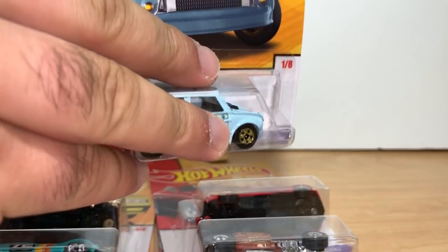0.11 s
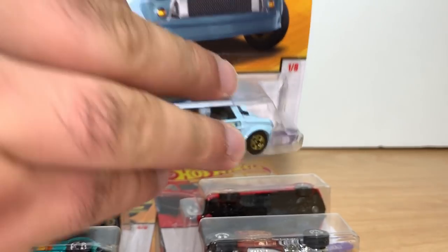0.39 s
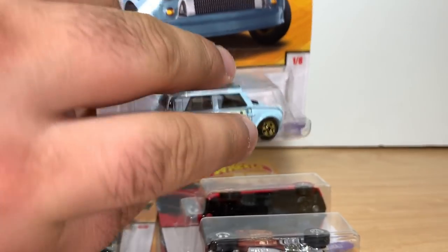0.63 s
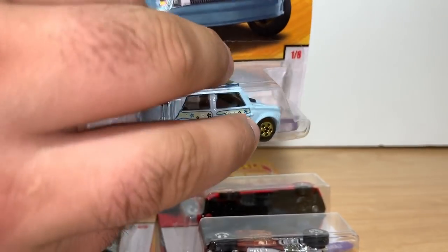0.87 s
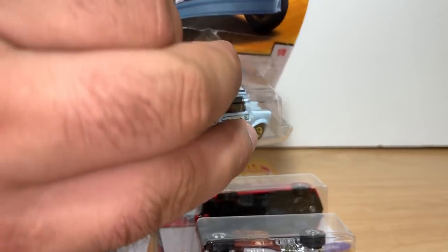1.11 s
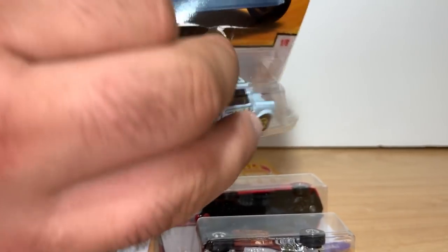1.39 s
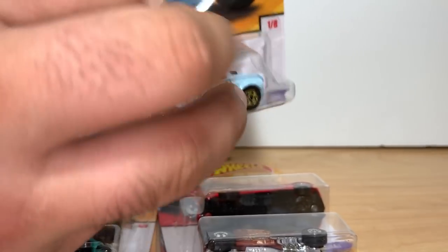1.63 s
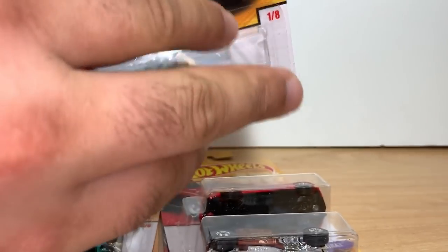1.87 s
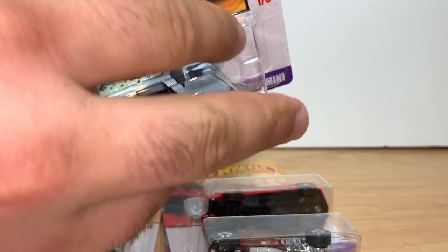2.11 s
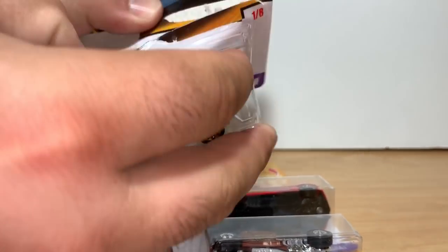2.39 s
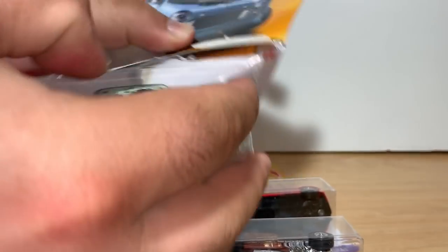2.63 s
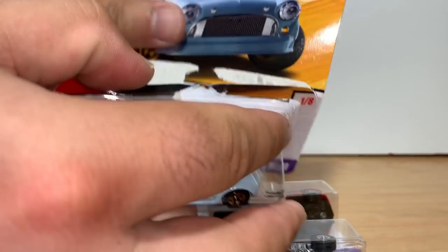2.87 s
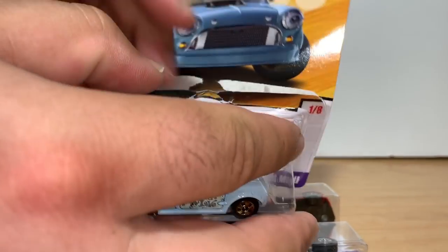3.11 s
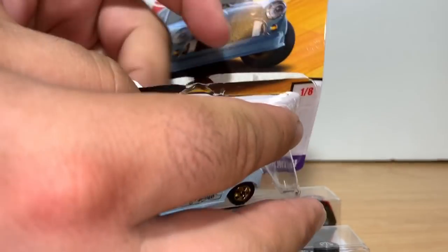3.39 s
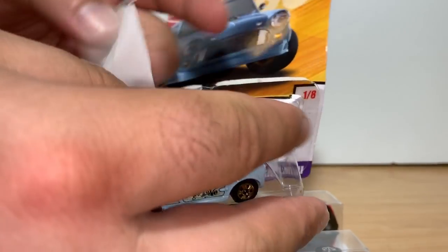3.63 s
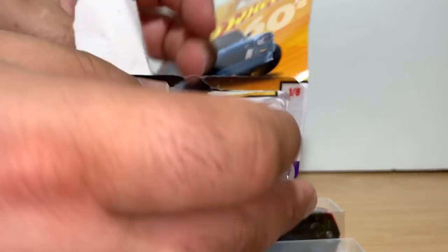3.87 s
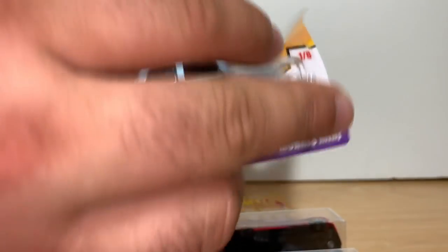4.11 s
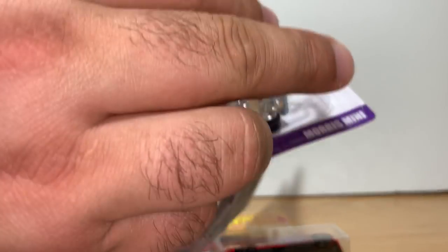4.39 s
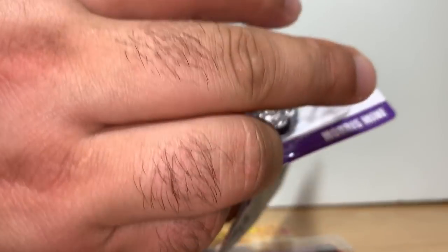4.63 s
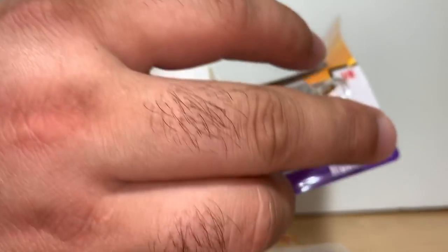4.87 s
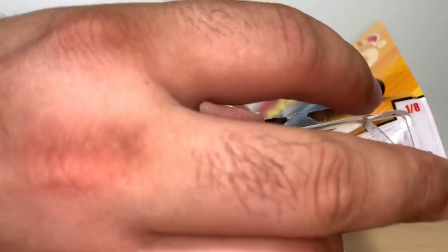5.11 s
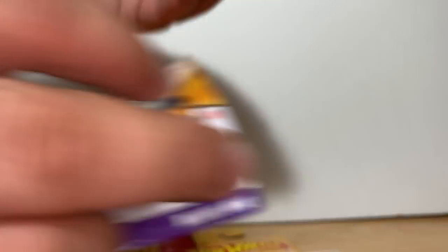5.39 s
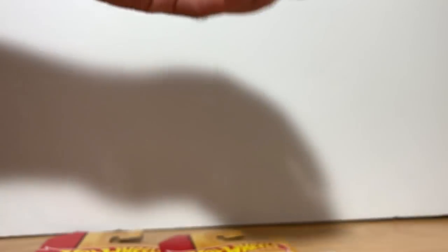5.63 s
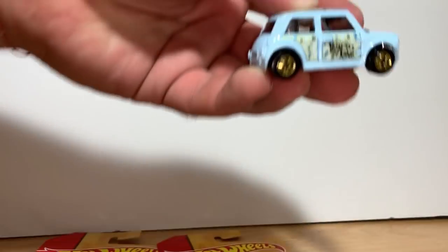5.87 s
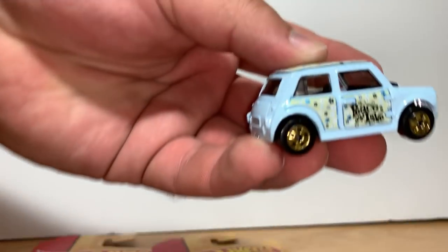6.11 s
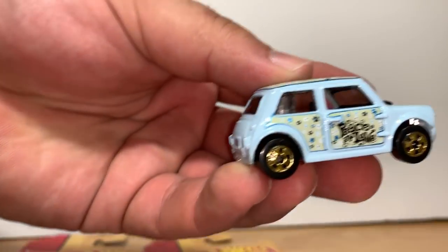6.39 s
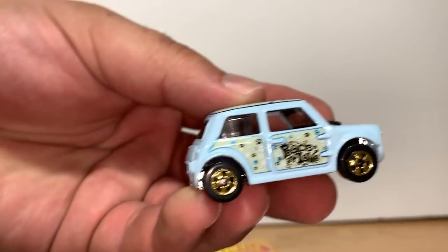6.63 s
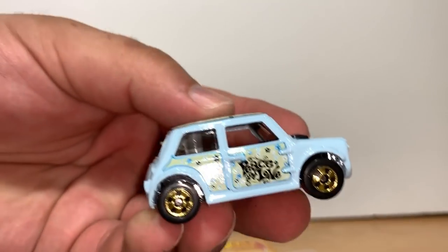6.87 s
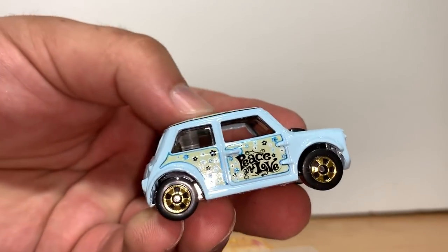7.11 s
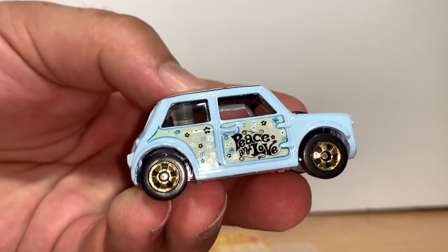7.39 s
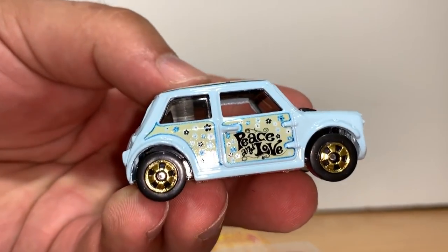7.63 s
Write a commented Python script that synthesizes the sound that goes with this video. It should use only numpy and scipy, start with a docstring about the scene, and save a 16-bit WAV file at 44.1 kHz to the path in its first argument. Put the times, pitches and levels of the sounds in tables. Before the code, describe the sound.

Thin stiff plastic crackles and snaps as it is torn from card by hand; a tiny metal toy ticks, and the empty pack drops with a rattle.

```python
"""Thin plastic creaks softly, then cracks and rips: close by, hands peel a plastic blister off its card.
Rips are clumped grains, creaks are nudged shell modes, snaps are noise cracks with a brief modal ring.
A small metal toy car comes free with faint bright ticks of noise; then the empty pack lands on something
hollow: dull modal blows, each with a fading rattle. A quiet small room, heard through two microphone ports."""
import sys
import numpy as np
from scipy import signal
from scipy.fft import rfft, irfft, next_fast_len
from scipy.io import wavfile
from scipy.ndimage import map_coordinates

SR = 44100
rng = np.random.default_rng(int(sys.argv[2]) if len(sys.argv) > 2 else 0)


def unload_audio(sound):
    """Save the sound as a 16-bit wav file, at the path given as the first command line argument."""
    columns = np.transpose(np.atleast_2d(sound))
    # keep every value between -1 and 1, then stretch to whole-number steps
    steps = np.round(np.clip(columns, -1, 1) * 32767)
    wavfile.write(sys.argv[1], SR, steps.astype(np.int16))


def convert_level_to_amplitude(level_db):
    """Map a level in decibels to its linear amplitude factor."""
    exponent = np.asarray(level_db, float) / 20
    return 10 ** exponent


N = 341775

# modes of shell and card: pitch_hz, level_db
SHELL_MODES = [(130, -0.5), (270, 1.5), (380, -1), (560, 0), (785, 0.5), (1270, 0), (1500, 8), (1900, 10),
               (2300, 7.5), (2750, 7.5), (4100, -3.5)]
# colour of a crack in the plastic: freq_hz, gain_db
CRACK_COLOUR = [(100, -11), (500, 1), (2000, 7), (15000, -10)]
# squeezes that flex the shell: full_strength_s, held_s, level_db, centre_hz of the modes that answer
FLEXES = [(0, 0.4, -52.5, 720), (0.395, 0.075, -37.5, 630), (.66, 0.037, -45, 700),
          (0.785, 0.04, -34.5, 650), (1.231, 0.068, -32.5, 1100), (1.38, 0.21, -44, 600),
          (1.687, 0.02, -32, 780), (1.761, 0.37, -42.5, 780), (2.24, 0.079, -35, 1100),
          (2.4, 0.019, -34, 900), (2.53, 0.26, -35, 857), (2.621, 0.049, -29.5, 900),
          (3.17, 0.057, -40, 900), (3.32, 0.21, -39, 1300), (3.61, 0.023, -34, 2000),
          (3.69, 0.1, -39.5, 1900), (3.86, 0.22, -37.5, 1100), (4.259, 0.051, -42.5, 800),
          (4.37, 0.32, -46.5, 1040), (4.62, 0.31, -45, 600), (5.02, 0.03, -37.5, 900),
          (5.125, 0.032, -40, 1300), (5.165, 0.016, -45, 330), (5.601, 0.018, -54, 599),
          (5.85, 0.12, -49.5, 1567), (6.136, 0.031, -62, 1322)]


def unit(x):
    """Scaled to rms 1."""
    return x / np.sqrt(np.mean(x ** 2) + 1e-20)


def along(points, hz):
    """Reads a (freq_hz, value) curve on a log frequency axis."""
    f, v = np.transpose(points)
    return np.interp(np.log(hz + 1), np.log(f + 1), v)


def filtered(x, response):
    """Multiplies the spectrum of x by a response of frequency, which may be complex."""
    size = next_fast_len(N + SR // 2)
    hz = np.fft.rfftfreq(size, 1 / SR)
    return irfft(rfft(x, size) * response(hz), size)[..., :N]


def equalised(x, curve):
    """x through a (freq_hz, gain_db) curve."""
    return filtered(x, lambda hz: convert_level_to_amplitude(along(curve, hz)))


def coloured(x, curve):
    """x through a (freq_hz, gain_db) curve, then scaled to rms 1."""
    return unit(equalised(x, curve))


def wobble(rate):
    """A smooth random curve with this many knots a second, 400 at most."""
    knots = rng.standard_normal(int(N * 400 / SR) + 4)
    return map_coordinates(knots, [np.arange(N) * min(rate, 400) / SR])


def grains(per_s, spread_db, clump_db):
    """Tiny breaks at random moments, of widely scattered size, swelling and thinning in clumps; rms 1."""
    chance, size, sign = rng.random(N), rng.exponential(size=N), rng.standard_normal(N)
    level_db = spread_db * np.minimum(size, 2.5) + clump_db * wobble(90)
    return unit((chance < per_s / SR) * sign * convert_level_to_amplitude(level_db))


def ring(modes, t60_1k, centre_hz, octaves, scatter_db):
    """One blow: modes near the centre sound most, each at a new strength; higher ones die sooner; peak 1."""
    hz, db = np.transpose(modes)[:, :, None]
    t = np.arange(SR // 4) / SR
    luck = rng.standard_normal((2, len(modes), 1))
    level_db = db - 6 * (np.log2(hz / centre_hz) / octaves) ** 2 + scatter_db * luck[0]
    fade_db = -60 * t / t60_1k * (hz / 1000) ** .3
    detuned_hz = hz * (1 + .04 * luck[1])
    tone = np.sum(convert_level_to_amplitude(level_db + fade_db) * np.sin(2 * np.pi * detuned_hz * t), 0)
    tone = tone * (1 - np.exp(-(t * centre_hz / 0.81) ** 2))  # swells in within about a cycle
    return tone / np.abs(tone).max()


def add(track, s, sound):
    """Mixes a sound in at a time in seconds."""
    track[round(s * SR):][:len(sound)] += sound


def stroke_powers(rows):
    """Power of each grip, every ms: it swells, holds and lets go at fixed speeds in dB."""
    rise_db_per_s, fall_db_per_s = 406.5, 301.5
    t = np.arange(0, N / SR + .002, .001)
    s, held, db = np.transpose(rows)[:3, :, None]
    swell_db = rise_db_per_s * np.maximum(s - t, 0)
    release_db = fall_db_per_s * np.maximum(t - s - held, 0)
    return convert_level_to_amplitude(2 * (db - swell_db - release_db))


def from_ms(curve):
    """A curve with a value every ms, read at every sample."""
    return np.interp(np.arange(N) / SR, np.arange(len(curve)) / 1000, curve)


def strokes(rows):
    """Gain of overlapping grips, their powers summed."""
    return from_ms(np.sqrt(np.sum(stroke_powers(rows), 0)))


def snaps():
    """Strain creaks up for some milliseconds, the fold or fibre cracks; after a fold the shell rings briefly."""
    # the shell buckles: start_s, crack_db (before colouring), ring_centre_hz, ring_re_crack_db
    folds = [(.403, -38.5, 610, 7), (0.45, -34.5, 504, 9.5), (0.4819, -42.5, 522, 15),
             (.516, -39, 1000, 14.5), (0.6563, -38.5, 680, 11), (0.824, -23.5, 594, 2),
             (1.0434, -20.5, 620, 8.5), (1.1353, -8.5, 786, 1), (1.1715, -17, 685, 0),
             (1.528, -24.5, 168, 3.5), (1.6292, -25, 850, 3.5), (1.711, -26.5, 770, 3),
             (1.7635, -38.5, 780, 15.5), (1.794, -40, 890, 13.5), (1.83, -36.5, 684, 13),
             (1.845, -43, 685, 16), (1.88, -34.5, 690, 6), (1.9107, -22, 760, -2.5),
             (1.9637, -33.5, 743.6, 10), (2.0096, -19.5, 895, 14.5), (2.2293, -12.5, 2420, 1),
             (2.26, -1.5, 2686, -20.5), (2.5091, -19.5, 2340, 2.5), (2.637, -22, 915, 5),
             (2.706, -22, 1510, 11), (2.98, -24, 297, 0.5), (3.038, -39.5, 700, 8), (3.1546, -19, 280, -11),
             (3.4095, -18, 1510, 4), (3.4388, -24.5, 694, -2), (3.928, -4, 293, -13.5),
             (4.0122, -13, 192, -9.5), (4.075, -22.5, 1450, 0), (4.265, -15.5, 567, -13.5),
             (4.349, -38.5, 1110, 15), (4.405, -34.5, 1110, 8.5), (4.563, -42.5, 450, 12),
             (4.5942, -16.5, 480, -3), (4.7261, -28.5, 403, -6), (4.8255, -33, 513, -3.5),
             (4.892, -42, 520, 11.5), (4.913, -46, 700, 20.5), (5.04, -35, 546, 10.5),
             (5.841, -53.5, 266, 17)]
    # single fibres of card part with a dry click: start_s, crack_db (before colouring)
    fibre_clicks = [(0.425, -29), (0.5483, -35), (1.39, -15), (2.1834, -29), (2.2138, -26), (2.3899, -18.5),
                    (3.4745, -12), (3.4947, -19), (3.5427, -24.5), (3.645, -17.5), (3.8566, -20),
                    (3.8795, -22), (5.0718, -25.5)]
    cracks, rings = np.zeros(N + SR), np.zeros(N + SR)
    t = np.arange(-SR // 50, SR // 20) / SR  # the crack is at 0
    strain = .25 * convert_level_to_amplitude(-60 * np.abs(t) / np.where(t < 0, .02, .04))
    after = np.maximum(t, 0)
    burst = (1 - np.exp(-after / 0.00059)) * convert_level_to_amplitude(-60 * after / 0.016)
    for s, db, *_ in folds + fibre_clicks:
        add(cracks, s + t[0], convert_level_to_amplitude(db) * (strain + burst) * rng.standard_normal(len(t)))
    for s, db, hz, ring_db in folds:
        tone = ring(SHELL_MODES, .03, hz, octaves=.6, scatter_db=2)
        add(rings, s, convert_level_to_amplitude(db + ring_db) * tone)
    return rings[:N] + equalised(cracks[:N], CRACK_COLOUR)


def ripping():
    """Glue and fibres let go as dense grains; the treble flickers and is strongest in the first pulls."""
    # pulls that rip glue and fibres: full_strength_s, held_s, level_db
    pulls = [(.2, 0.091, -45), (.35, 0.035, -46), (.78, 0.034, -48.5), (.91, 0.062, -43),
             (1.02, 0.079, -33), (1.09, 0.21, -32), (1.41, 0.07, -43), (1.63, 0.15, -45.5),
             (2.245, 0.03, -25.5), (2.395, 0.03, -23.5), (2.53, 0.19, -31), (2.75, 0.071, -42),
             (2.87, .13, -49), (3.31, 0.044, -45), (3.47, 0.05, -28.5), (3.62, 0.037, -32),
             (3.71, 0.064, -34.5), (3.92, 0.18, -44.5), (4.18, 0.2, -42.5), (4.47, 0.27, -47.5),
             (4.72, 0.25, -50), (5.02, .12, -46.5)]
    # colour of the rip: freq_hz, gain_db
    rip_colour = [(200, -25.5), (1000, -2), (2500, -4), (9000, -5.5), (14000, -9.5)]
    # course of the rip's treble: time_s, gain_db
    treble_course = [(.4, 10.5), (1.299, 6), (1.599, -12.5), (2.3, 4.5), (5.199, -6.5)]
    rip = coloured(grains(6000, spread_db=3.5, clump_db=4) * convert_level_to_amplitude(2 * wobble(45)), rip_colour)
    treble = filtered(rip, lambda hz: 1 / (1 + (8000 / (hz + 1)) ** 4))
    treble_db = np.interp(np.arange(N) / SR, *np.transpose(treble_course)) + 2.5 * wobble(25)
    return strokes(pulls) * (rip + (convert_level_to_amplitude(treble_db) - 1) * treble)


def creases():
    """Separate folds nudge the shell's modes, which sag and rise as it bends; strong squeezes set the centre."""
    grip = grains(400, spread_db=3.5, clump_db=2.5)
    weight = stroke_powers(FLEXES)
    octave = np.log2([row[3] for row in FLEXES])
    centre = from_ms(octave @ weight / weight.sum(0))
    out, power = 0, 0
    for hz, db in SHELL_MODES[1:]:  # the lowest mode takes no part in the creasing
        own = grains(900, spread_db=2, clump_db=3)
        pushes = convert_level_to_amplitude(3 * wobble(40)) * (grip + .6 * own)
        mode = signal.iirpeak(hz, 6, SR)
        tone = signal.lfilter(*mode, signal.lfilter(*mode, pushes))  # a soft push: steep skirts
        bent = np.interp(np.arange(N) + 75 * wobble(12), np.arange(N), tone)  # a moving delay bends pitch
        gain = convert_level_to_amplitude(db - 6.5 * (np.log2(hz) - centre) ** 2)
        out = out + gain * unit(bent)
        power = power + gain ** 2
    crackle = convert_level_to_amplitude(-13) * coloured(grip, CRACK_COLOUR)
    return unit((out / np.sqrt(power) + crackle) * convert_level_to_amplitude(1.5 * wobble(30)))


def flexing():
    """Squeezes bring up the creasing of the shell."""
    return strokes(FLEXES) * creases()


def bumping():
    """Hands bump the pack and the desk: a low, unsteady rumble of noise."""
    # bumps of the hands: full_strength_s, held_s, level_db
    bumps = [(.42, 0.17, -50), (.81, 0.02, -37.5), (1.55, 0.39, -52), (2.99, 0.053, -43),
             (3.17, .33, -46.5), (3.94, 0.66, -60), (6.56, .05, -47.5)]
    # colour of the rumble: freq_hz, gain_db
    thud_colour = [(20, -28.5), (50, 8), (120, 4.5), (300, -41)]
    return strokes(bumps) * coloured(rng.standard_normal(N) * convert_level_to_amplitude(4 * wobble(25)), thud_colour)


def ticks():
    """Small bright contacts of the freed car's axles and metal: a sharp edge and a short hiss."""
    # the toy car ticks in the fingers: start_s, level_db (before colouring)
    contacts = [(5.3345, -33), (5.5657, -41.5), (5.7039, -38.5), (5.739, -33.5), (5.8608, -41)]
    # colour of a tick: freq_hz, gain_db
    tick_colour = [(800, -24.5), (2500, 6.5), (15000, -0.5)]
    out, t = np.zeros(N + SR), np.arange(SR // 10) / SR
    edge = (1 - np.exp(-t / 0.0017)) * convert_level_to_amplitude(-60 * t / 0.023)
    hiss = 0.15 * convert_level_to_amplitude(-60 * t / 0.26)
    for s, db in contacts:
        add(out, s, convert_level_to_amplitude(db) * (edge + hiss) * rng.standard_normal(len(t)))
    return equalised(out[:N], tick_colour)


def drops():
    """A dull blow on a hollow body, then the light pack rattles to rest and keeps the body humming."""
    # the pack lands: start_s, peak_db, ring_centre_hz, rattle_re_peak_db, rattle_centre_hz, rattle_t60_s
    landings = [(6.538, -15, 388, -10, 1495, 0.27), (6.738, -20.5, 245, 0.5, 825, 0.18),
                (7.653, -34, 925, -3, 1132, 0.178)]
    # modes of the hollow thing it lands on: pitch_hz, level_db
    hollow_modes = [(250, -1.5), (360, -2), (530, -3), (780, 1), (980, 0.5), (1450, 8), (1700, 8.5)]
    # colour of the rattle before each landing dulls it: freq_hz, gain_db
    rattle_colour = [(60, -16.5), (300, -5), (1500, -15), (6000, -31.5), (15000, -40.5)]
    out, t = np.zeros(N + SR), np.arange(SR // 2) / SR
    hiss = np.pad(coloured(grains(4000, spread_db=1, clump_db=1), rattle_colour), (0, SR))
    for s, db, hz, rattle_db, rattle_hz, t60 in landings:
        add(out, s, convert_level_to_amplitude(db) * ring(hollow_modes, .05, hz, octaves=.6, scatter_db=1))
        body = ring(hollow_modes, 0.03, rattle_hz, octaves=0.54, scatter_db=1)
        hum = signal.fftconvolve(rng.standard_normal(len(t)), body, "same")
        dull = signal.butter(1, 3.0 * rattle_hz, fs=SR)
        rattle = signal.lfilter(*dull, hiss[round(s * SR):][:len(t)]) + 0.97 * unit(hum)
        fade = convert_level_to_amplitude(db + rattle_db - 60 * t / t60) * (1 - np.exp(-t / 0.018))
        add(out, s, fade * rattle)
    return out[:N]


def tails(t60s):
    """Two unrelated noise tails of energy 1; each frequency dies at its own speed."""
    hz, t, z = signal.stft(rng.standard_normal((2, SR // 2)), SR, nperseg=256)
    fade = convert_level_to_amplitude(-60 * t / along(t60s, hz)[:, None])
    tail = signal.istft(z * fade, SR, nperseg=256)[1]
    return tail / np.linalg.norm(tail, axis=1, keepdims=True)


def desk_scatter(near):
    """The desk smears the near sound with one quick noise tail."""
    return signal.fftconvolve(near, tails([(100, 0.15), (10000, 0.029)])[0])[:N]  # (freq_hz, t60_s)


def room_tail(near):
    """The small room answers 300 samples later with two unrelated tails."""
    # decay of the room: freq_hz, t60_s
    room_t60 = [(150, 1), (1000, 0.077), (4000, 0.31), (15000, 0.018)]
    late = np.pad(near, (300, 0))[None]
    return convert_level_to_amplitude(-14.0) * signal.fftconvolve(late, tails(room_t60), axes=1)[:, :N]


def ports(alike, unlike):
    """Both ports share one part and oppose the other; the right lags by a phase set by the housing."""
    # phase between the ports: freq_hz, right_lag_radians
    lag = [(600, .2), (1640, 2.3), (2150, 4.5), (3300, 9.3), (3750, 12.2), (4700, 12), (5500, 14.6),
           (10450, 9.45), (16000, 3.5)]
    # likeness of the ports: freq_hz, likeness (0-1)
    likeness = [(700, .97), (1300, .65), (1900, .95), (3900, .4), (7000, .4), (8500, .87), (10500, .995)]
    # balance of the ports: freq_hz, left_over_right_db
    balance = [(1200, 2), (6200, -1.8)]

    def turn(hz):
        return np.arccos(np.clip(along(likeness, hz), 0, 1)) / 2

    def lean(hz):  # half the difference; the right port gets the inverse
        return convert_level_to_amplitude(along(balance, hz) / 2) * np.exp(.5j * np.interp(hz, *np.transpose(lag)))

    mid, side = filtered(np.array([alike, unlike]), lambda hz: [np.cos(turn(hz)), np.sin(turn(hz))])
    return filtered(np.array([mid + side, mid - side]), lambda hz: [lean(hz), 1 / lean(hz)])


def quiet_air():
    """Faint coloured noise: both ports share one layer and oppose another that lacks the bass."""
    # colour of the air: freq_hz, gain_db
    air_colour = [(20, 3), (60, 0), (300, -9), (700, -22), (2000, -28), (16000, -36.5)]
    air = convert_level_to_amplitude(-61.5) * np.array([coloured(rng.standard_normal(N), air_colour) for layer in range(2)])
    apart = filtered(air[1], lambda hz: hz / (hz + 900))
    return air[0] + apart * [[1], [-1]]


def scene():
    """The pack close by, the desk's quick scatter, the room's tail and the quiet air."""
    near = snaps() + ripping() + flexing() + bumping() + ticks() + drops()
    room = room_tail(near)
    return ports(near + room[0], desk_scatter(near) + room[1]) + quiet_air()


def top_cut(x):
    """Nothing passes above the cut-off."""
    return signal.sosfilt(signal.butter(12, 16660, fs=SR, output="sos"), x)


def record(dry):
    """Peaks are rounded off below 0.75 of full scale and the top treble drops by 28 dB."""
    rounded = dry / (1 + np.abs(dry / .75) ** 6) ** (1 / 6)
    dull = filtered(rounded, lambda hz: np.where(hz < 15750, 1, convert_level_to_amplitude(-28)))
    return top_cut(dull)


dry = scene()
out = record(dry)
unload_audio(out)
```